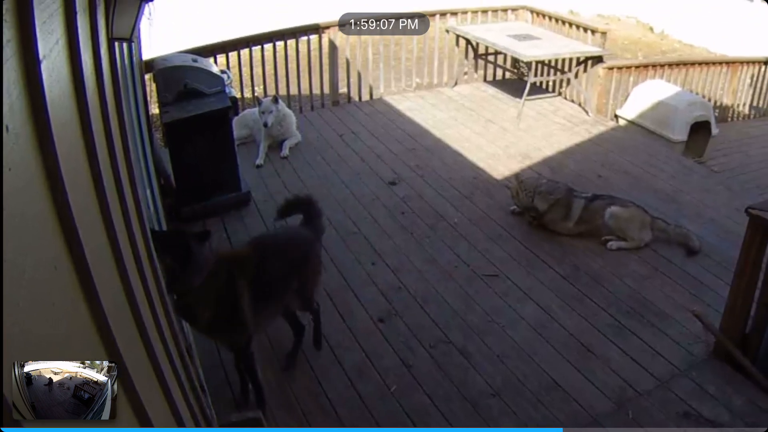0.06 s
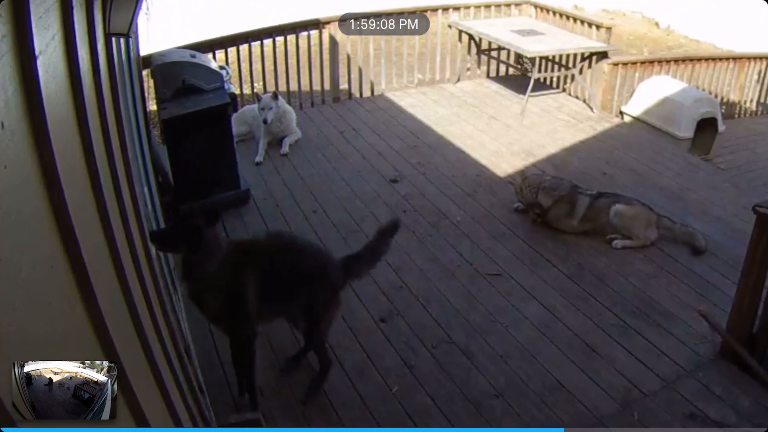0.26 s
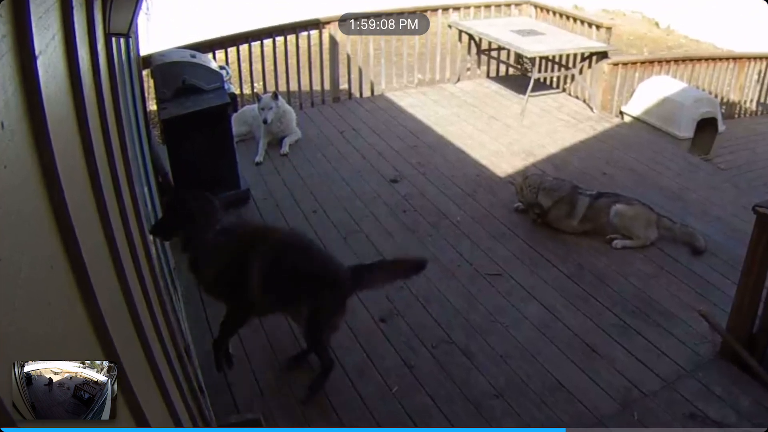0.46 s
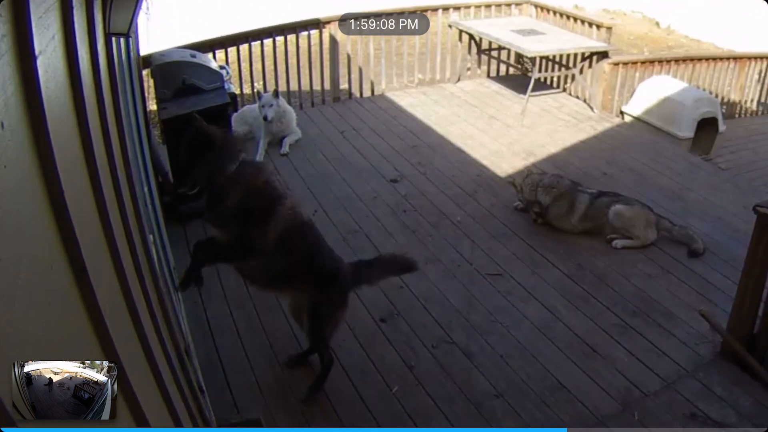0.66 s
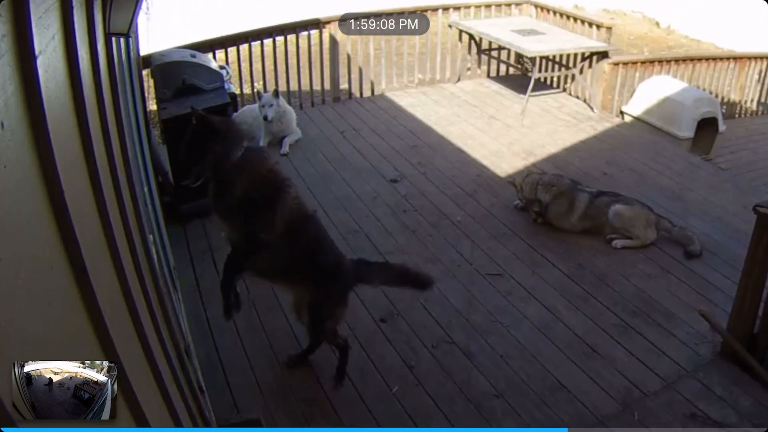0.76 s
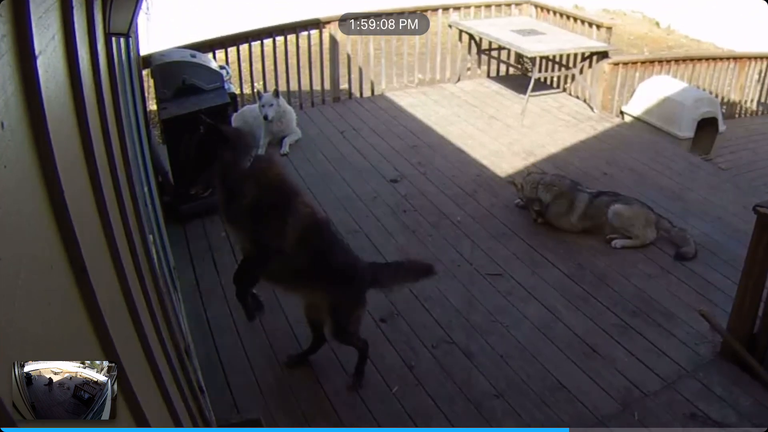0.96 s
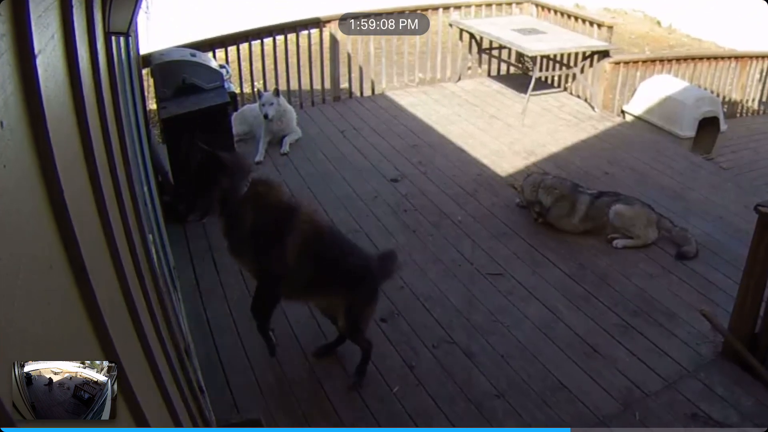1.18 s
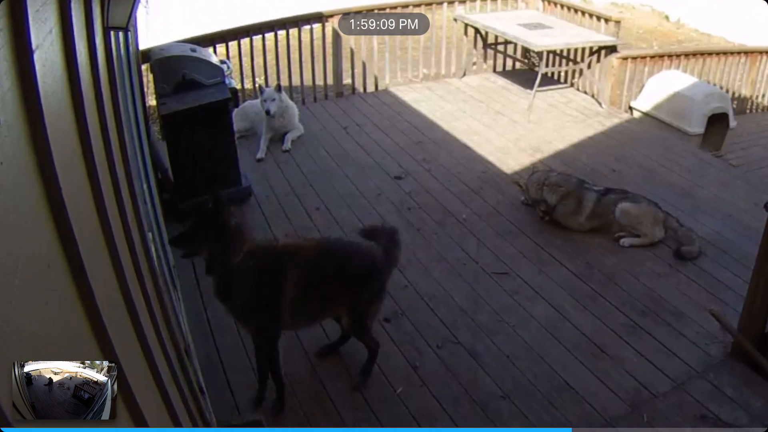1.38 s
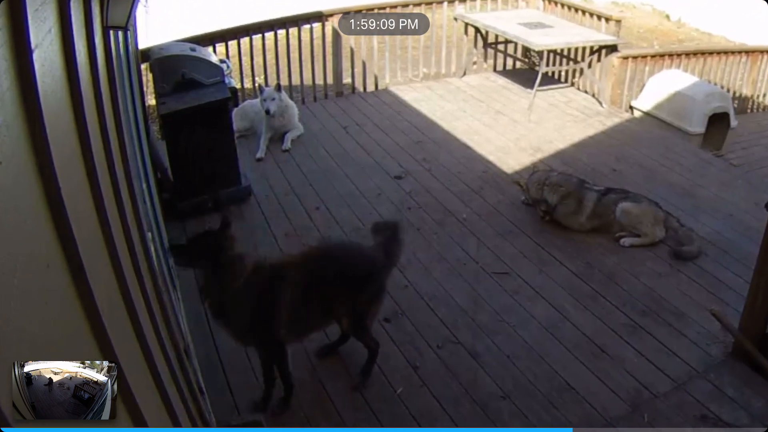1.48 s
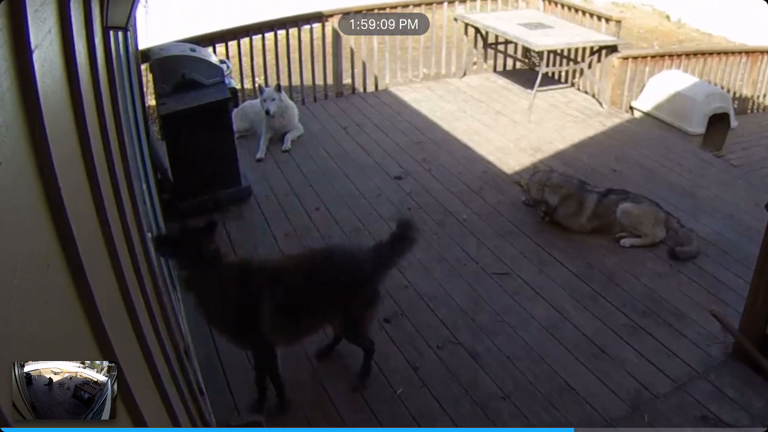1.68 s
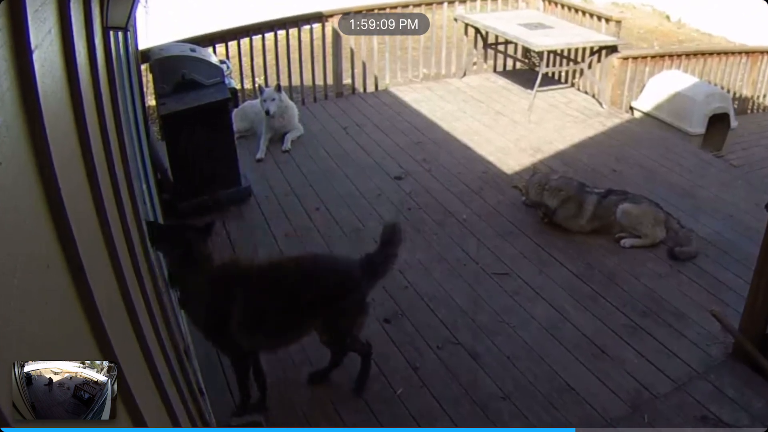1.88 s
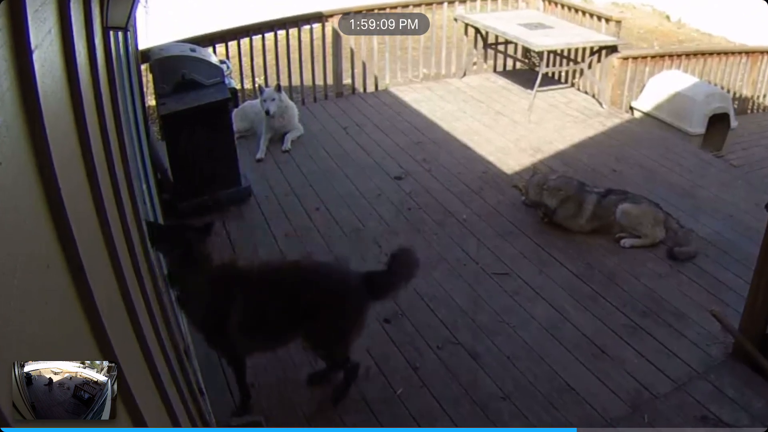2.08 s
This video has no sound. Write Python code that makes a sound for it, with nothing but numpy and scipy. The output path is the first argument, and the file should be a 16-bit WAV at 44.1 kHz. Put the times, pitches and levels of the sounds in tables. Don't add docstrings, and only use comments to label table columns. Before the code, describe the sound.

Dog paws and claws on a wooden deck and glass door. A soft thud and scrape open, then a sharp cluster of hollow knocks and glassy claw scrapes at 0.25-0.4 s. A lighter scrape comes at 0.6, paw blows at 0.75-1.0, a claw skid with thumps at 1.25, steps from 1.4, the hardest thud near 1.6, then sparse taps to 2.1. Faint outdoor air, dull echo, muffled small microphone.

```python
import sys
import numpy as np
from scipy import signal
from scipy.fft import rfft, irfft
from scipy.io import wavfile

SR = 44100
rng = np.random.default_rng(int(sys.argv[2]) if len(sys.argv) > 2 else 0)


def unload_wav(signal):
    wavfile.write(
        sys.argv[1],
        SR,
        np.round(np.clip(np.atleast_2d(signal).T, -1, 1) * 32767).astype(np.int16),
    )


def gain_from_decibels(decibels):
    exponent = np.asarray(decibels, float) / 20
    return 10 ** exponent


N = 92610
SPAN = 13230
EVENT_T = np.arange(SPAN) / SR
SLIPS_PER_S, SLIP_SPREAD_DB = 1500, 5


def rms_one(x):
    return x / np.sqrt(np.mean(x ** 2) + 1e-20)


def peak_one(x):
    return x / (np.abs(x).max() + 1e-20)


def fade(t60):
    return gain_from_decibels(-60 * EVENT_T / max(t60, 0.005))


def add(out, start_s, x):
    i = int(start_s * SR)
    x, i = x[max(-i, 0):], max(i, 0)
    out[i:i + len(x)] += x[:len(out) - i]


def grains(per_s, spread_db, size):
    sign = rng.choice([-1, 1], size)
    strength = gain_from_decibels(spread_db * np.minimum(rng.exponential(1, size), 4))
    return sign * strength * (rng.random(size) < per_s / SR)


# (frequency [Hz], level [dB per Hz])
AIR_TONE = [(30, -16.5), (180, 2), (340, 1.5), (720, 6.5), (1100, -21), (2600, -12), (5800, -19),
            (7600, -34)]


def air():
    hz, db = np.transpose(AIR_TONE)
    shape = gain_from_decibels(np.interp(np.log(np.fft.rfftfreq(N, 1 / SR) + 1), np.log(hz), db))
    noise = irfft(rfft(rng.standard_normal(N)) * shape, N)
    return gain_from_decibels(-55) * rms_one(noise)


def echo(x):
    dull = signal.butter(1, 3000, fs=SR, output="sos")
    tail = signal.sosfilt(dull, rng.standard_normal(SPAN)) * fade(0.11)
    tail[:300] = 0
    tail = tail / np.sqrt(np.sum(tail ** 2))
    return gain_from_decibels(-14) * signal.fftconvolve(x, tail)[:N]


# (level [dB], fade by 60 dB [s])
BOARD_MODES = [(-13, 0.19), (1.5, 0.033), (7.5, 0.1), (-9.5, .07), (1.5, 0.077), (6, 0.14), (0, 0.12),
               (3, 0.16), (-6, 0.035), (8, 0.095), (-14.5, 0.017), (-8, 0.018), (-13.5, 0.04),
               (-16.5, 0.027)]
BOARD_PITCHES = [240, 302, 341, 392, 445, 511, 552, 590, 660, 714, 770, 840, 960, 1090]


def board_ring(centre_hz, colour_db):
    spread_db, detune = 2.0, 0.006
    rise_s, contact_s = 0.0005, 0.00012
    ring = np.zeros(SPAN)
    for hz, (db, t60) in zip(BOARD_PITCHES, BOARD_MODES):
        luck, off = rng.normal(0, 1, 2)
        octaves = np.log2(hz / centre_hz)
        level = gain_from_decibels(db + spread_db * luck - colour_db * octaves ** 2)
        ring += level * fade(t60) * np.sin(2 * np.pi * hz * (1 + detune * off) * EVENT_T)
    ring *= (1 - np.exp(-EVENT_T / rise_s)) ** 2
    band = signal.butter(4, [260.3, 952], "band", fs=SR, output="sos")
    ring = signal.sosfilt(band, ring)
    t = EVENT_T[:441]
    soft_touch = t * np.exp(-t / contact_s)
    return signal.fftconvolve(ring, soft_touch)[:SPAN]


# (frequency [Hz], width [Hz], level [dB])
GLASS_MODES = [(1270, 870, -10.5), (1715, 88, -4.5), (1977, 530, -9.5), (2360, 334, 1), (2524, 372, 3.5),
               (2758, 310, -0.5), (3047, 380, -7), (3577, 31, -8.5), (3700, 74, -4.5), (4235, 1000, -17),
               (5940, 490, -12), (7060, 360, -40)]


def glass(x, frame_db):
    frame_top_hz = 2350
    out = 0
    for k, (hz, width_hz, db) in enumerate(GLASS_MODES):
        if hz < frame_top_hz:
            db = db + frame_db
        elif hz > 1.25 * frame_top_hz:
            db = db - 1.3 * frame_db
        r = np.exp(-np.pi * 1.5 * width_hz / SR)
        b = [1 - r * r, 0, r * r - 1]
        a = [1, -2 * r * np.cos(2 * np.pi * hz / SR), r * r]
        once = signal.lfilter(b, a, x + 1e-18)
        out = out + gain_from_decibels(db) * (-1) ** k * signal.lfilter(b, a, once)
    return out


# (time [s], level [dB])
SHUFFLE_LEVELS = [
    (0.0, -56),
    (1.57, -44),
    (1.789, -46),
    (2.1, -60),
]


def shuffle():
    wood = np.zeros(N)
    for _ in range(4):
        touches = grains(220 / 4, 6.9, N)
        wood += signal.fftconvolve(touches, board_ring(300, 3.0))[:N]
    grit = glass(grains(1500, 7.1, N), 2.0)
    s, db = np.transpose(SHUFFLE_LEVELS)
    level = gain_from_decibels(np.interp(np.arange(N) / SR, s, db) - 1.8)
    return level * (rms_one(wood) + gain_from_decibels(-16.5) * rms_one(grit))


# (time [s], peak level [dB])
WEIGHT_LANDINGS = [(0.262, -47), (0.313, -51), (0.369, -53.5), (0.638, -64), (0.755, -57), (0.803, -60),
                   (0.885, -51), (0.963, -53.5), (1.245, -40.5), (1.399, -52.5), (1.493, -52.5),
                   (1.588, -44), (1.69, -47)]


def pushes():
    thump_hz, thump_db, thump_t60_s = 69, 5.5, 0.11
    band = signal.butter(1, [thump_hz / 3, thump_hz * 2], "band", fs=SR, output="sos")
    out = np.zeros(N)
    for s, db in WEIGHT_LANDINGS:
        lump = rng.standard_normal(SPAN) * fade(thump_t60_s)
        lump = signal.sosfilt(band, signal.sosfilt(band, lump))
        add(out, s, gain_from_decibels(db + thump_db) * peak_one(lump))
    return out


# (time [s], length
# [s], frequency [Hz], peak level [dB])
PANE_TONES = [(1.524, .008, 2540, -33.5), (1.535, .004, 2585, -25.5), (1.547, .028, 2530, -35),
              (1.555, 0.014, 3700, -36), (1.577, 0.012, 3680, -43.5), (0.137, 0.045, 3700, -48.5),
              (0.143, .005, 2470, -39), (0.151, .04, 2540, -48.5), (0.155, .004, 2300, -42),
              (0.265, .003, 2530, -21), (0.611, .003, 2030, -26.5), (0.613, .003, 2740, -30),
              (0.623, .003, 2700, -38), (1.247, .004, 2360, -27), (1.251, .006, 2580, -31.5),
              (1.446, .003, 3030, -43.5), (1.969, .005, 2690, -37)]


def squeaks():
    width_hz = 169
    r = np.exp(-np.pi * width_hz * 2 / SR)
    out = np.zeros(N)
    for s, length_s, hz, db in PANE_TONES:
        slips = grains(SLIPS_PER_S, SLIP_SPREAD_DB, SPAN) * (EVENT_T < length_s)
        pole = [1, -2 * r * np.cos(2 * np.pi * hz / SR), r * r]
        once = signal.lfilter([1, 0, -1], pole, slips + 1e-18)
        add(out, s, gain_from_decibels(db) * peak_one(signal.lfilter([1], pole, once)))
    return out


# (time [s], peak level [dB], fade by 60 dB [s], share of the frame [dB])
CLAW_SKIDS = [(-0.002, -35.5, 0.023, -0.5), (0.0574, -45, 0.9, 1.5), (0.1427, -41.5, 0.27, -2.5),
              (0.236, -38, 0.21, 1.5), (0.2653, -22.5, 0.14, 3), (0.278, -33.5, 0.33, 1),
              (0.3518, -36.5, 0.36, -2.5), (0.3839, -44, 0.14, -11), (0.6035, -34, 0.045, 6.5),
              (0.609, -29.5, 0.17, -3), (0.6355, -40, 0.44, 0), (0.756, -44.5, 0.15, -4.5),
              (0.798, -38.5, 0.1, -0.5), (0.821, -42, 0.27, -1.5), (0.88, -38.5, 0.074, -0.5),
              (0.8967, -38.5, 0.21, -4.5), (0.9693, -36.5, 0.14, -20), (1.141, -43.5, 0.31, -14),
              (1.194, -43, 0.7, -2), (1.2456, -34, 0.26, 1), (1.2466, -23, 0.13, 4.5),
              (1.273, -36.5, 0.17, 2), (1.3666, -43, 0.08, 0), (1.3982, -37.5, 0.11, -1.5),
              (1.489, -33.5, 0.31, -4), (1.5252, -38, 0.18, -1), (1.5363, -31.5, 0.13, -4.5),
              (1.5583, -48.5, 0.028, -7), (1.5871, -33.5, 0.11, -16), (1.6943, -40.5, 0.073, 4),
              (1.7698, -42.5, 0.3, -2.5), (1.853, -41, 0.031, -2.5), (1.969, -38, 0.27, -0.5)]


def skids():
    attack_s, head_gain, head_t60_s = 0.0018, 1.3, 0.0071
    attack = np.minimum(1, EVENT_T / attack_s)
    out = np.zeros(N)
    for s, db, t60, frame_db in CLAW_SKIDS:
        shape = (fade(t60) + head_gain * fade(head_t60_s)) * attack
        slips = grains(SLIPS_PER_S, SLIP_SPREAD_DB, SPAN) * shape
        slips[40] = gain_from_decibels(0.5)
        add(out, s, gain_from_decibels(db - 0.5) * peak_one(glass(slips, frame_db)))
    return out


# (time [s], peak level [dB], length [s])
CLAW_TICKS = [(0.065, -74, 0.0027), (0.08, -54, 0.0041), (0.11, -65, 0.0063), (0.148, -52.5, 0.005),
              (0.162, -54, 0.004), (0.2104, -53, 0.0022), (0.234, -38.5, 0.0021), (0.272, -44, 0.0033),
              (0.2784, -56, 0.00456), (0.311, -43.5, 0.0078), (0.35, -55.5, 0.0074), (0.38, -48, 0.0023),
              (0.473, -54.5, 0.008), (0.4927, -43, 0.0055), (0.564, -62, 0.005), (0.616, -47, 0.005),
              (0.658, -48, 0.0085), (0.7135, -44.5, 0.005), (0.753, -38.5, 0.0054), (0.7866, -42, 0.004),
              (0.8, -42, 0.006), (0.816, -47, 0.0065), (0.849, -56.5, 0.0036), (0.88, -45.5, 0.012),
              (0.9562, -46, 0.005), (0.964, -41, 0.0068), (1.1408, -62, 0.0039), (1.164, -55.5, 0.0036),
              (1.185, -55.5, 0.0038), (1.225, -54, 0.0064), (1.3259, -48, 0.0022), (1.3653, -51, 0.0044),
              (1.4022, -43, 0.0062), (1.4216, -42.5, 0.0021), (1.4455, -46.5, 0.0043),
              (1.4874, -35.5, 0.0036), (1.522, -47, 0.0074), (1.532, -53, 0.00425), (1.585, -42.5, 0.0036),
              (1.595, -50.5, 0.0045), (1.6917, -37.5, 0.0056), (1.765, -53, 0.0039), (1.8303, -33, 0.0017),
              (1.843, -80, 0.005), (1.963, -52.5, 0.0031), (2.03, -59, 0.005)]


def ticks():
    attack_s, tail_db, tail_t60_s = 0.0004, -25, 0.09
    band = signal.butter(2, [4900, 7400], "band", fs=SR, output="sos")
    out = np.zeros(N)
    for s, db, length_s in CLAW_TICKS:
        shape = np.minimum(1, EVENT_T / attack_s) / (1 + (EVENT_T / max(length_s, 0.002)) ** 3)
        run = grains(25000, 2.8, SPAN) * shape
        scratching = gain_from_decibels(tail_db) * fade(tail_t60_s) * grains(2100, 4.8, SPAN)
        add(out, s, gain_from_decibels(db + 3.5) * peak_one(signal.sosfilt(band, run + scratching)))
    return out


# (time [s], peak level [dB], colour centre [Hz], time before the ring is cut short [s])
PAW_THUDS = [(-0.003, -32.5, 390, 0.018), (0.08, -35.5, 743, 0.013), (0.235, -26, 361, 0.021),
             (0.266, -17.5, 515, 0.0089), (0.28, -16.5, 452, 0.0086), (0.311, -14, 625, 0.019),
             (0.358, -23, 496, 0.017), (0.371, -29, 462, 0.017), (0.485, -32.5, 686, 0.027),
             (0.612, -31.5, 637, 0.022), (0.647, -24.5, 734, 0.022), (0.713, -41, 530, 0.055),
             (0.755, -17, 600, 0.011), (0.787, -19, 555, 0.0067), (0.801, -19.5, 650, 0.0076),
             (0.88, -22, 524, 0.014), (0.967, -17, 582, 0.029), (1.097, -33, 374, 0.043),
             (1.167, -31, 503, 0.0078), (1.248, -17, 527, 0.0071), (1.26, -20, 522, 0.011),
             (1.318, -32, 510, 0.008), (1.365, -33, 440, 0.0078), (1.402, -17.5, 607, 0.01),
             (1.447, -18.5, 507, 0.014), (1.489, -19.5, 535, 0.022), (1.587, -11, 602, 0.013),
             (1.692, -18.5, 520, 0.011), (1.83, -28.5, 500, 0.019), (2.092, -28.5, 600, 0.0063)]
# (time [s], peak level [dB], colour centre [Hz])
TOE_TAPS = [(0.036, -44.5, 417), (0.059, -59, 520), (0.211, -45.5, 710), (0.287, -25.5, 504),
            (0.326, -21, 700), (0.385, -28.5, 420), (0.475, -30.5, 500), (0.497, -30, 590),
            (1.235, -31, 480), (0.642, -45, 520), (0.659, -30, 664), (0.683, -33.5, 520),
            (0.77, -21.5, 620), (0.819, -26, 480), (0.83, -22.5, 400), (0.898, -23.5, 640),
            (0.922, -31, 450), (0.956, -26.5, 590), (0.961, -17, 550), (0.977, -23, 545), (0.99, -32, 570),
            (1.012, -25.5, 352), (1.129, -36, 517), (1.194, -35, 523), (1.273, -25, 485),
            (1.416, -22.5, 610), (1.427, -29, 490), (1.462, -49, 534), (1.496, -26.5, 506),
            (1.501, -30, 600), (1.51, -21.5, 560), (1.534, -24.5, 494), (1.601, -27, 676),
            (1.61, -27.5, 674), (1.626, -26, 358), (1.652, -34, 486), (1.699, -23, 710), (1.707, -20, 680),
            (1.717, -37, 560), (1.849, -61, 560), (1.953, -36.5, 490), (1.971, -34, 510)]


def thuds():
    colour_db = 16.5
    lead_s, lead_db = 0.003856, -38.5
    toe_settle_s = 0.007
    blows = list(PAW_THUDS) + [(*tap, toe_settle_s) for tap in TOE_TAPS]
    out = np.zeros(N)
    for s, db, hz, settle_s in blows:
        free = 1 / (1 + (EVENT_T / max(settle_s, 0.003)) ** 6)
        first = peak_one(board_ring(hz, colour_db))
        toes = grains(200, 0.99, SPAN) * free
        bounces = peak_one(signal.fftconvolve(toes, board_ring(hz, colour_db))[:SPAN])
        knock = gain_from_decibels(-29) * glass(rng.standard_normal(SPAN) * fade(0.073), 3.5)
        body = (first + gain_from_decibels(-6) * bounces) * (free + gain_from_decibels(-12))
        add(out, s, gain_from_decibels(db) * (peak_one(body) + knock))
        add(out, s - lead_s, gain_from_decibels(db + lead_db) * (first * free + knock))
    return out


def scene():
    dog = squeaks() + skids() + ticks() + thuds()
    return (air() + echo(dog) + shuffle() + pushes() + dog)[None]


def low_pass(x):
    return signal.sosfilt(signal.butter(12, 8010, fs=SR, output="sos"), x)


def record(dry):
    run_in = 600
    x = np.pad(dry, ((0, 0), (run_in, 0)), "reflect")
    steep = signal.cheby1(10, 1, 7395, fs=SR, output="sos")
    mic = signal.butter(2, [47, 5830], "band", fs=SR, output="sos")
    x = signal.sosfilt(mic, signal.sosfilt(steep, x))[:, run_in:]
    mix = x + gain_from_decibels(-100) * rng.standard_normal(x.shape)
    return low_pass(mix)


dry = scene()
out = record(dry)
unload_wav(out)
```